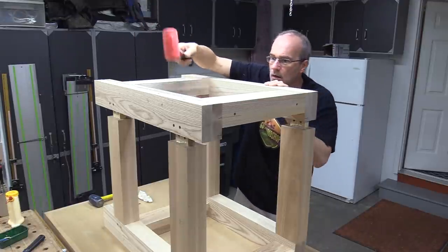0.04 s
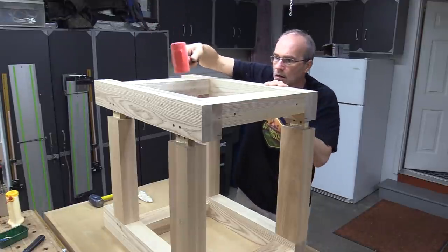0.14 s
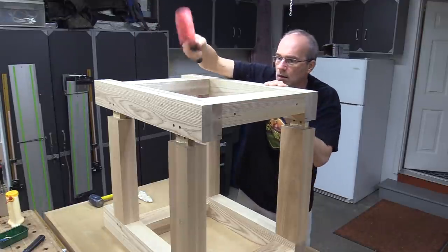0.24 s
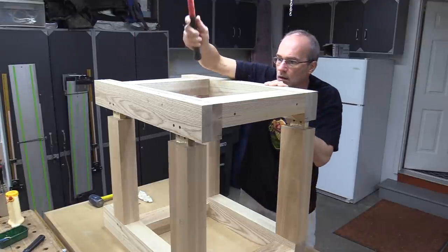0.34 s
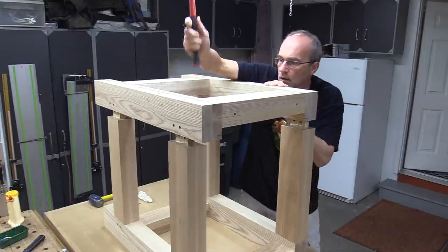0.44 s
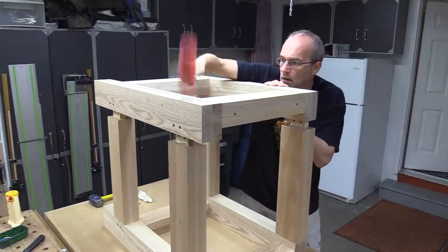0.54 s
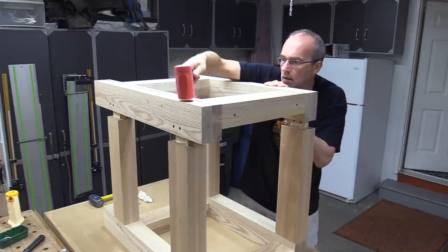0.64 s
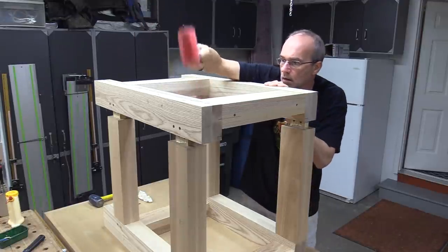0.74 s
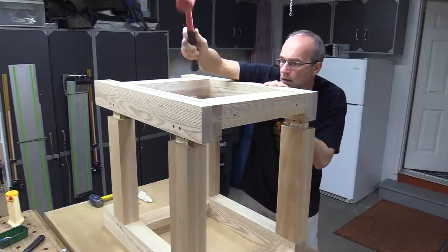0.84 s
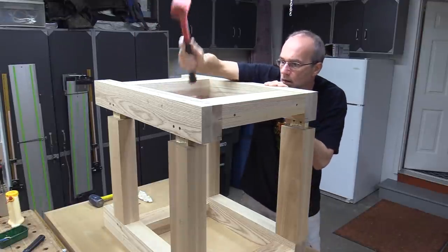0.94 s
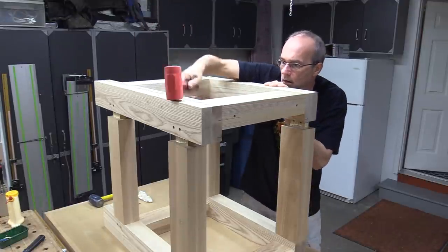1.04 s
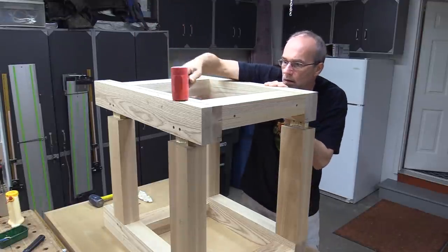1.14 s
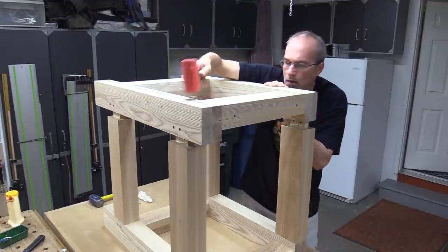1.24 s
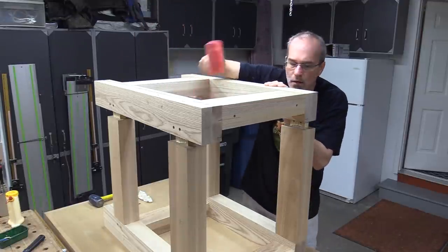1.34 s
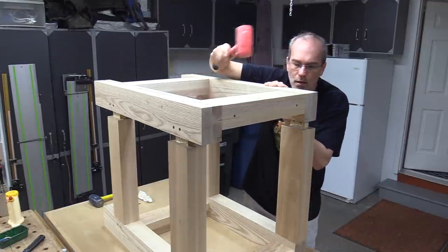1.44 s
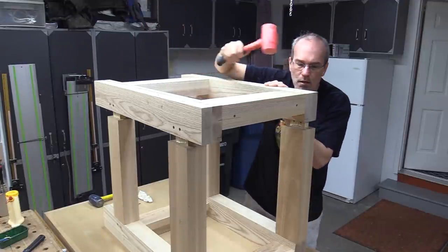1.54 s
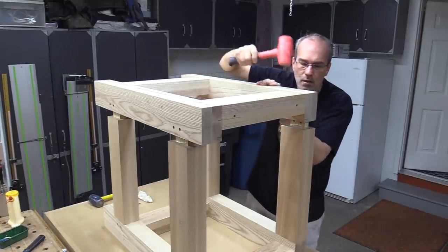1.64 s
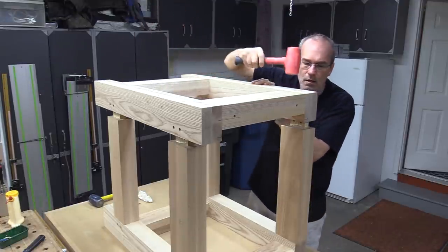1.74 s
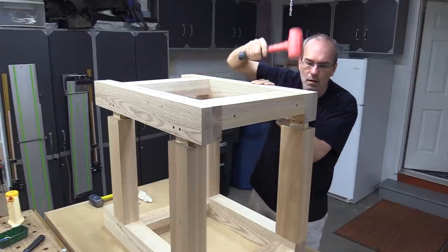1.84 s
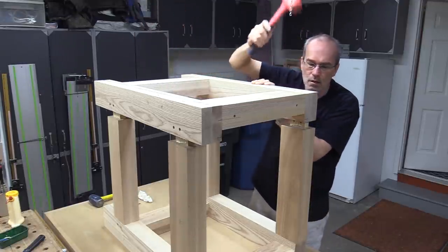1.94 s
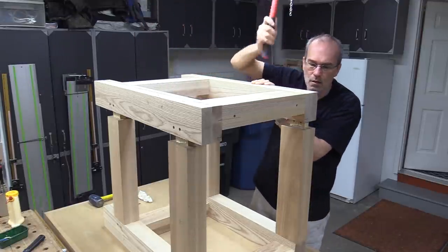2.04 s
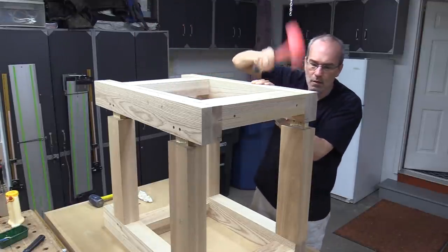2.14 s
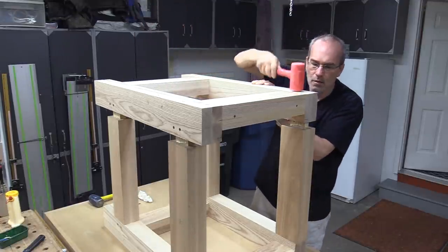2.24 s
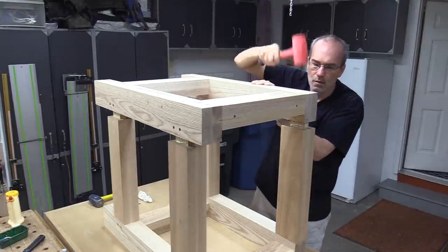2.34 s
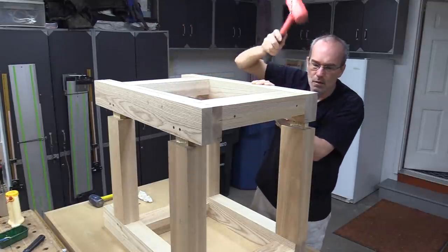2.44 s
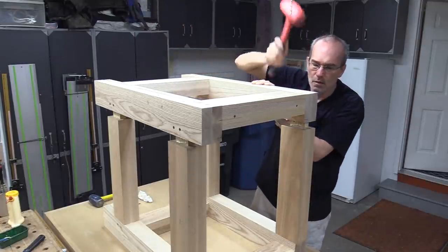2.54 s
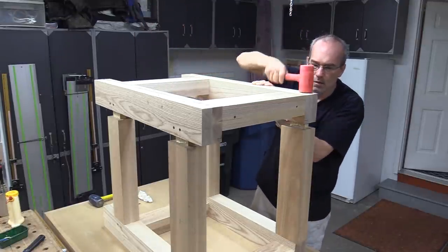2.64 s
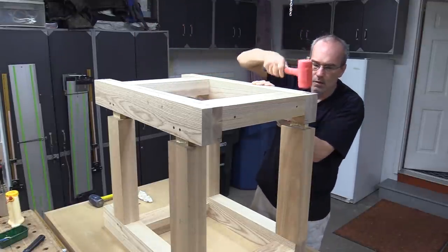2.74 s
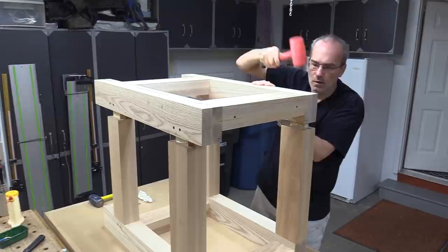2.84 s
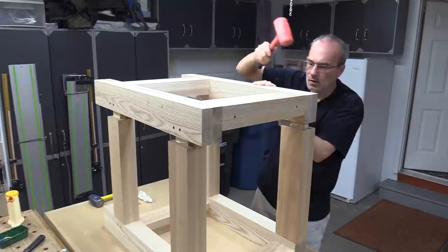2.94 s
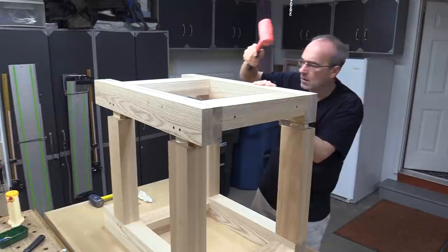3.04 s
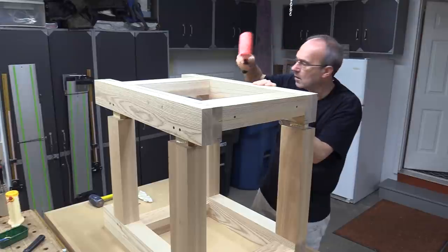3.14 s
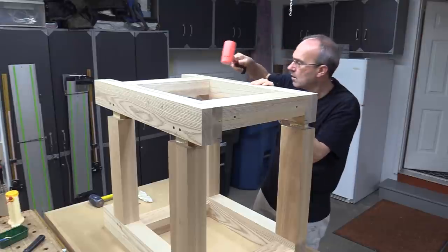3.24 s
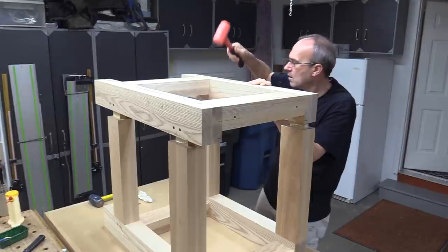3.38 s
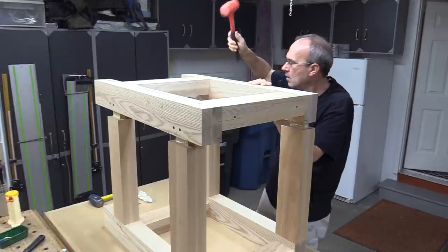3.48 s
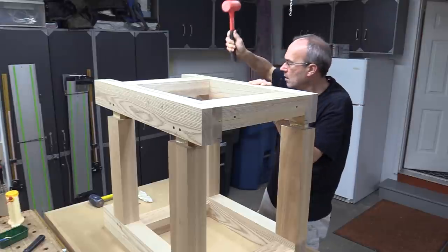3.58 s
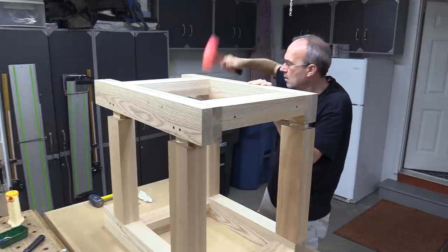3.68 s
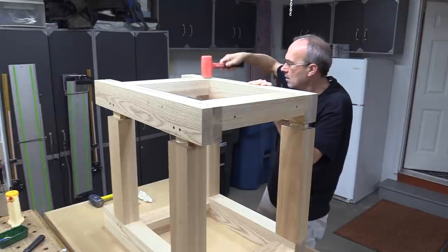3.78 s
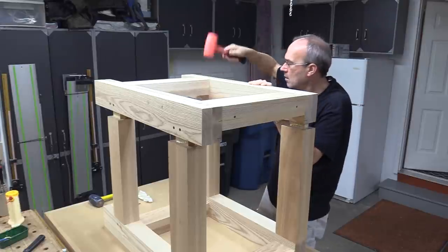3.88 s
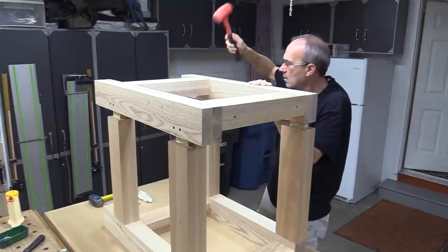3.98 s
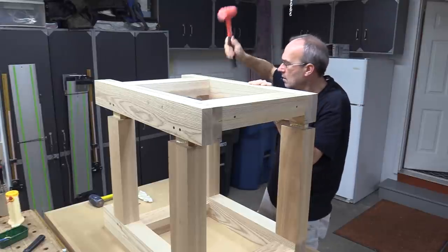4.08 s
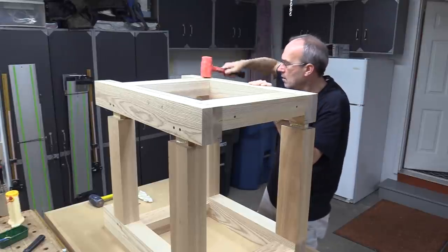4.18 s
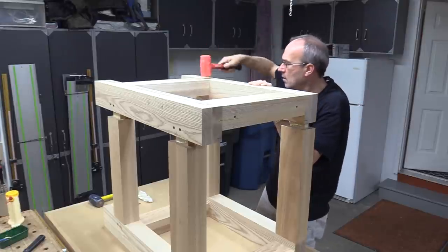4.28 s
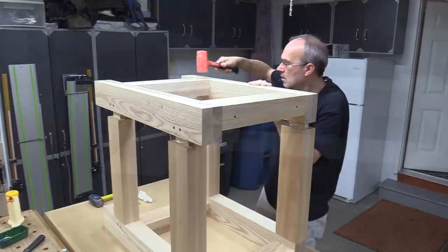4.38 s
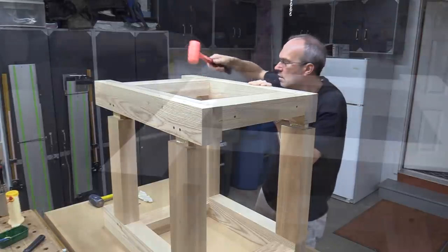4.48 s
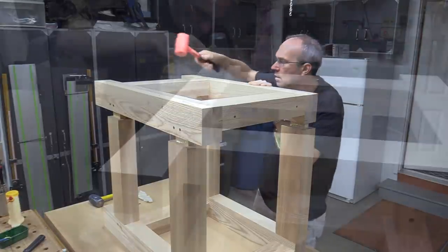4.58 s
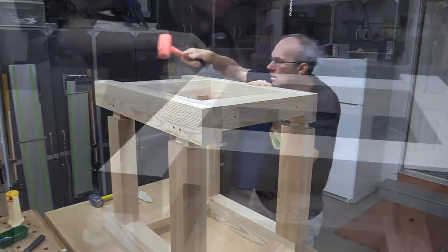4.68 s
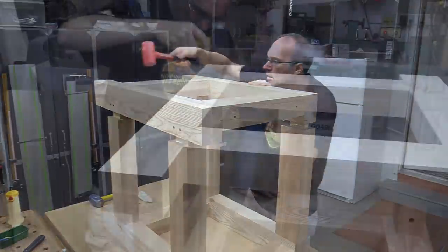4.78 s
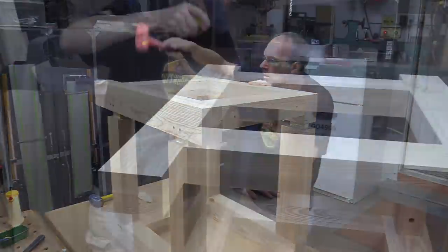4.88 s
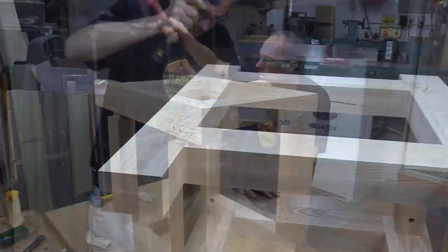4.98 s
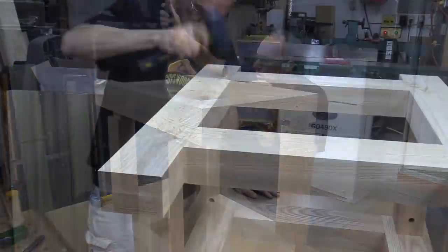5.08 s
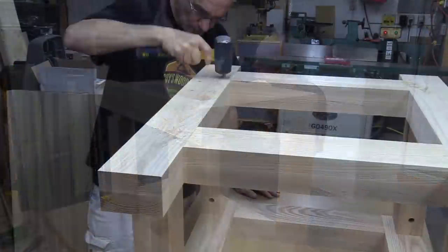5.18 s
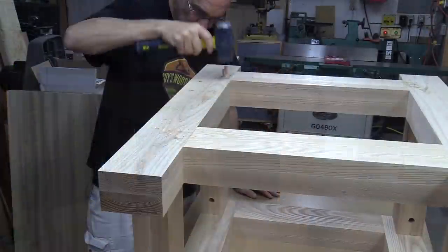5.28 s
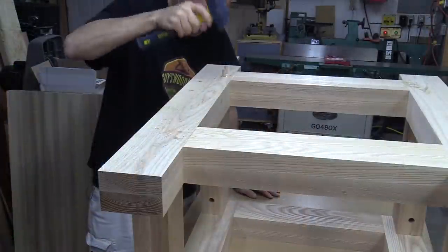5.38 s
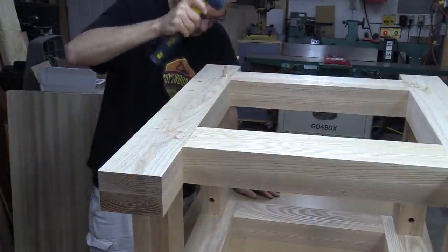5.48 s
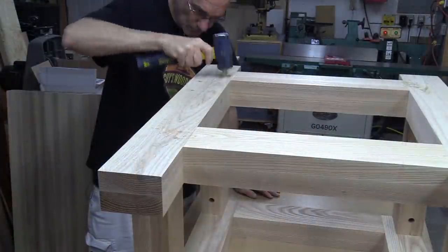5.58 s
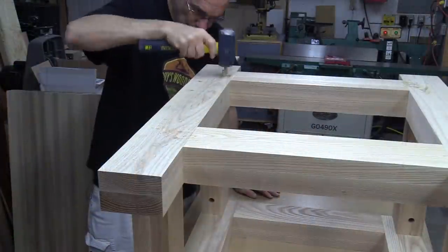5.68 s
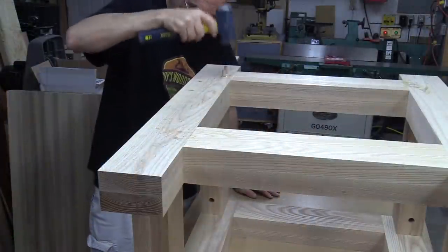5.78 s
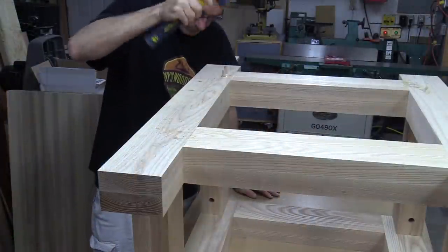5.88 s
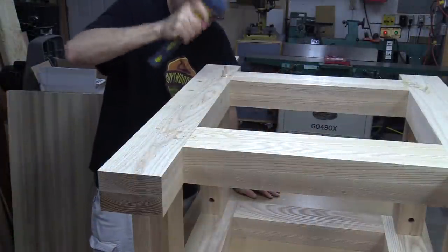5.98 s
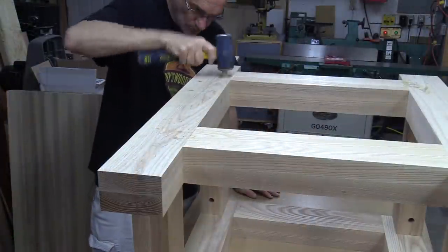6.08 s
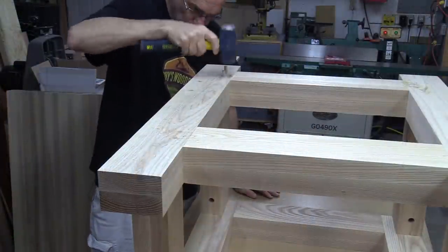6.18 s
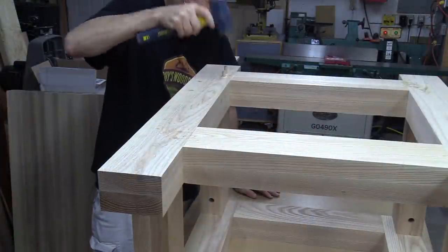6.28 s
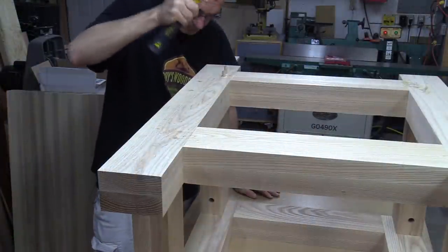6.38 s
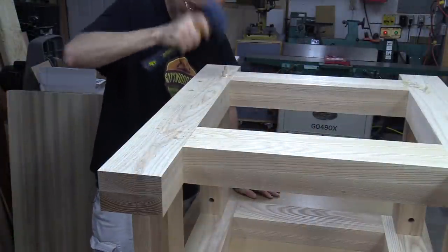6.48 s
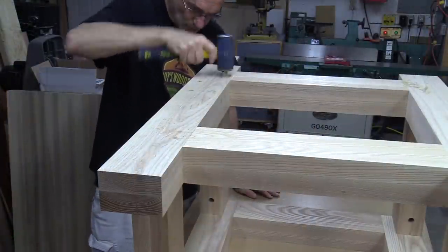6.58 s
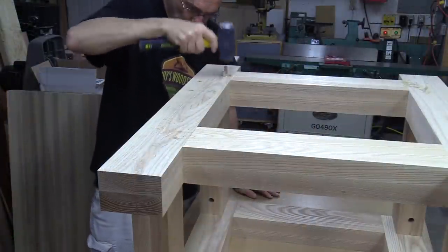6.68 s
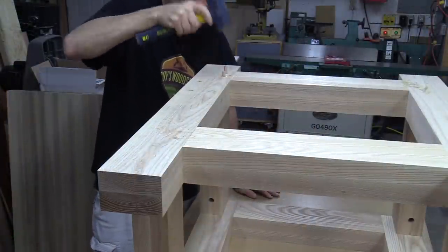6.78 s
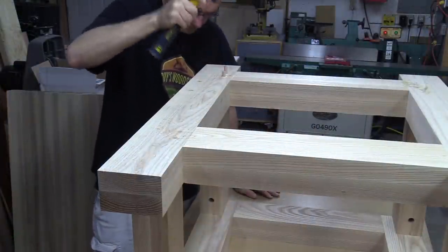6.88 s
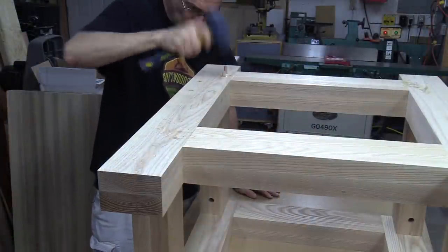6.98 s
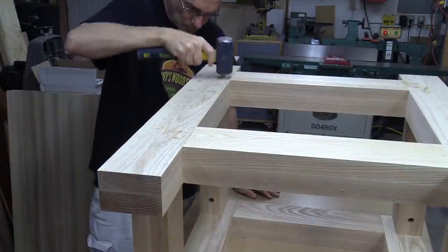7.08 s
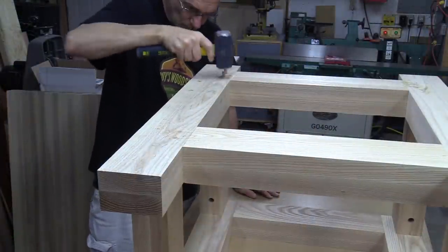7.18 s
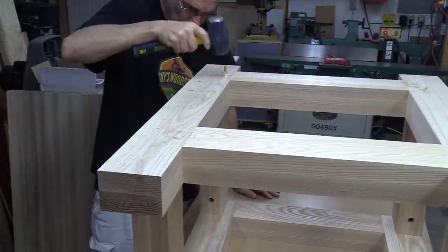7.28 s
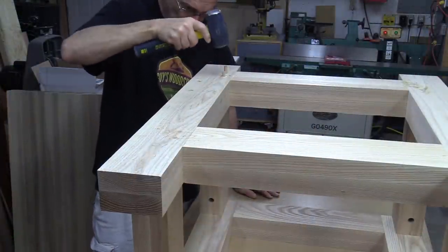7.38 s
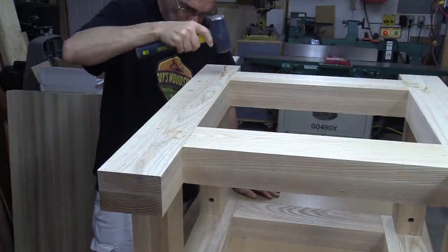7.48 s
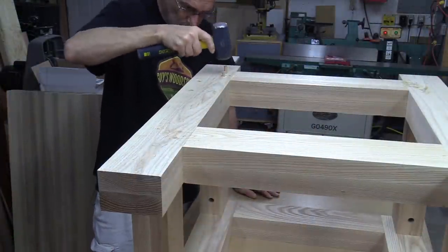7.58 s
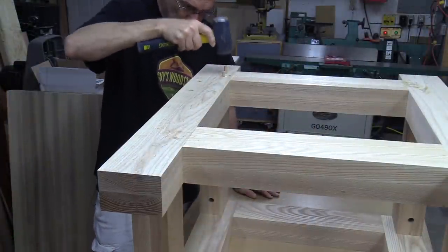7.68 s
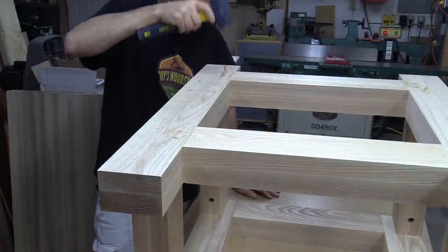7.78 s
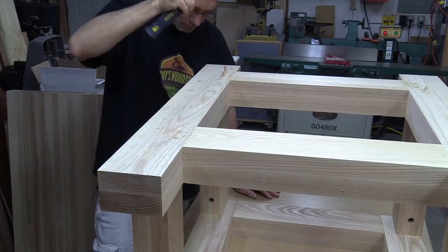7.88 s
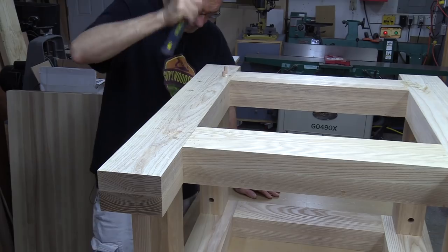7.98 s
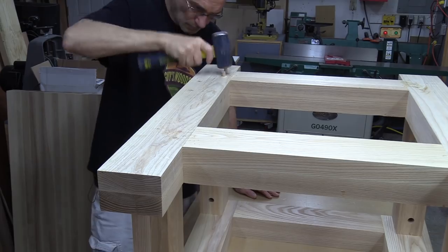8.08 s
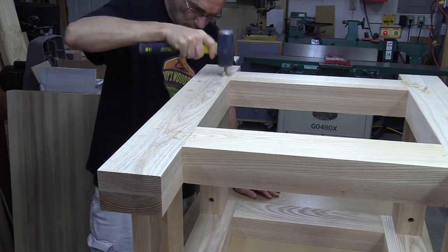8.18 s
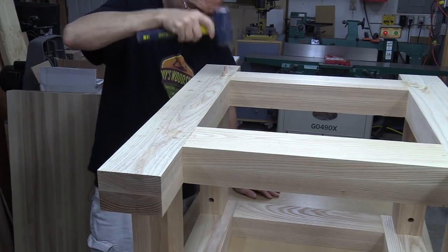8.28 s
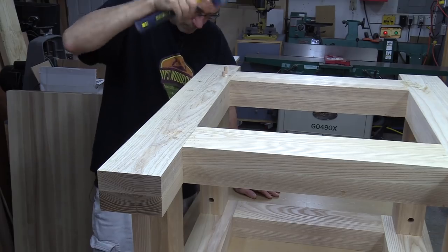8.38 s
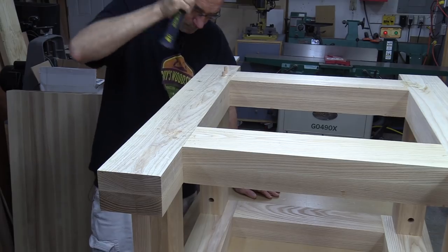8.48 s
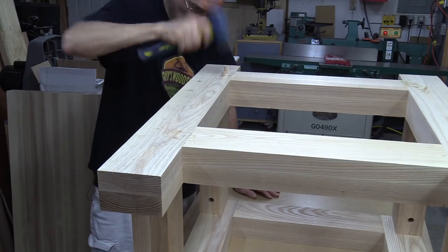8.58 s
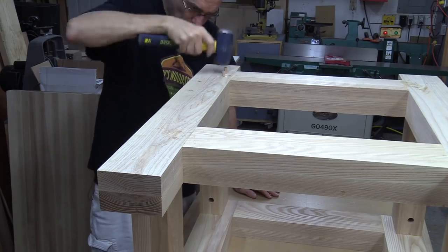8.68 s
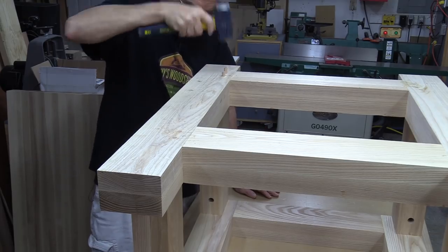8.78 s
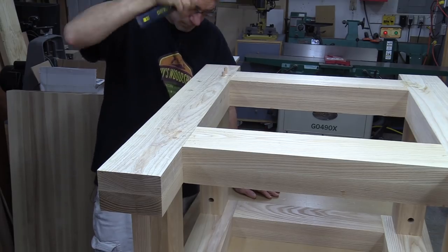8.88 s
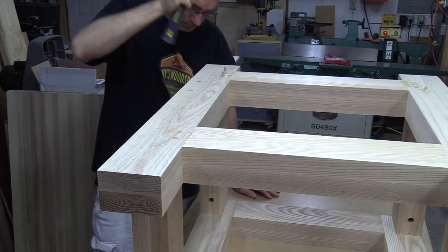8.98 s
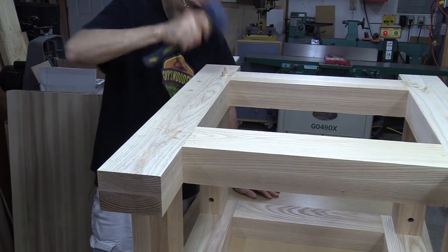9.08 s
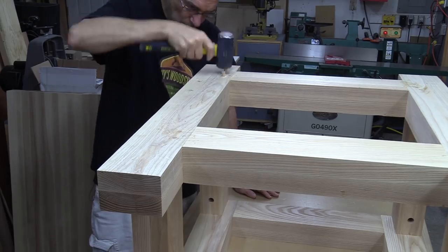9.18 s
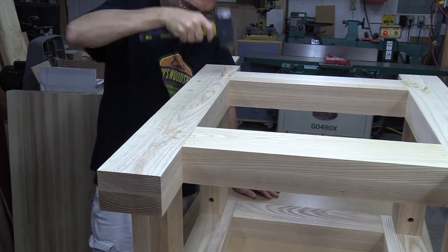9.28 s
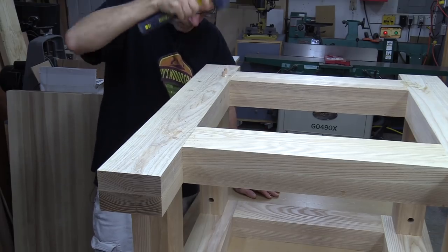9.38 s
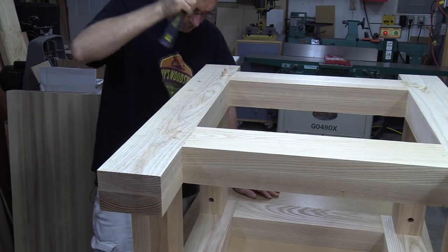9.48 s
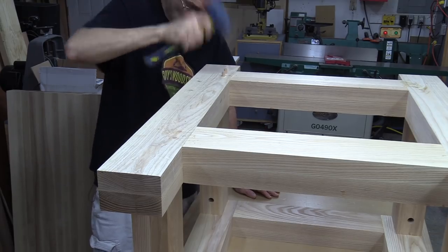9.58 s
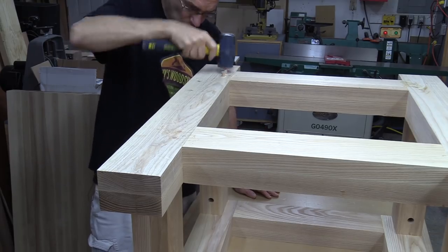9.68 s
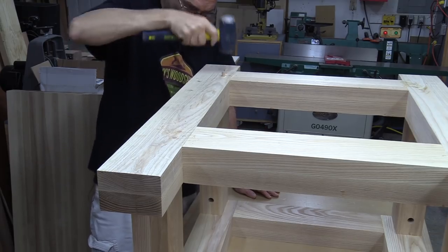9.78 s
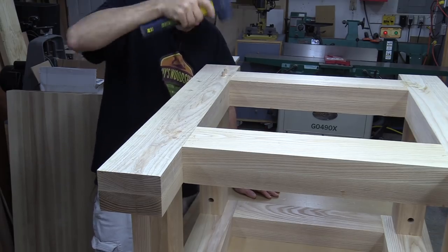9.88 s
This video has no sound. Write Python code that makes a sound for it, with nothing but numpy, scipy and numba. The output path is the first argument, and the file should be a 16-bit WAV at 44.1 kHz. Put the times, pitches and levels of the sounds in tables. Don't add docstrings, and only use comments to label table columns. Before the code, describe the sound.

In a hard-walled workshop, close to the microphone, a shot-filled mallet strikes a heavy wooden frame in three pairs of loud, clipped knocks, with a faint shot rattle before the swings. Then a steel hammer drives one peg with five evenly spaced blows and, after a short gap, a second with four. Each blow leaves a half-second echo over a faint hum.

```python
import sys
import numpy as np
from scipy import signal
from scipy.fft import rfft, irfft, next_fast_len
from scipy.io import wavfile
from scipy.ndimage import uniform_filter1d
from numba import njit

SR = 44100
rng = np.random.default_rng(int(sys.argv[2]) if len(sys.argv) > 2 else 0)


def makeup_ratio(level_db):
    decades = np.asarray(level_db, float) / 20
    return 10 ** decades


def unload_audio(sound):
    columns = np.transpose(np.atleast_2d(sound))
    steps = np.round(np.clip(columns, -1, 1) * 32767)
    wavfile.write(sys.argv[1], SR, steps.astype(np.int16))


N = 437913
SPAN = 40960

# frequency in Hz, level in dB per Hz.
FIRST_AIR = [(12, -45.5), (20, -20.5), (63, -4.5), (87, -16.5), (400, -18.5), (2140, -37.5), (11800, -47.5),
             (22000, -120)]
SECOND_AIR = [(12, -39.5), (20, -4.5), (230, -10), (798, -25), (1100, -23.5), (1930, -36), (11800, -43),
              (22000, -120)]
# start in seconds, end in seconds.
CUT = (4.5, 5.2)
# frequency in Hz, level in dB, t60 in seconds.
FADING = [(1330, -34.5, 0.55), (1200, -44, 0.49), (1040, -40.5, .4), (1550, -57, .4), (695, -42, 0.31)]
# time in seconds, peak in dB.
TAP = [
    (3.399, -36.5),
]
# frequency in Hz, width in Hz, level in dB.
RAIL = [(635, 120, 8.5), (880, 150, 0), (1120, 150, 12.5), (1550, 300, -10.5)]
# centre in seconds, half length in seconds, dull end in dB,
# bright end in dB.
SLIDES = [
    (0.026, .1, -52.5, -46.5),
    (1.748, .064, -52, -49),
    (1.93, .066, -70, -77),
    (3.373, .05, -61.5, -56.5),
    (8.08, .08, -67, -76),
]
# frequency in Hz, width in Hz, level in dB.
DULL_END = [(2870, 550, 11), (4900, 2500, 10.5), (7200, 2500, -1), (10500, 2500, -5)]
BRIGHT_END = [(3700, 900, 1), (5800, 890, -1), (8500, 2000, 0.5), (11300, 3500, 3)]
# lead in seconds, half length in seconds,
# dull end in dB, bright end in dB.
SWINGS = [(.137, .031, -49, -60), (.1, .028, -47, -60)]
# height as a share of the lead, effort in dB.
EFFORT = [(.87, -4), (1.019, 1), (1.02, 0.5)]
# time in seconds, peak in dB.
TICKS = [
    (4.904, -52.5),
]
# start in seconds, peak in dB, treble tilt in dB per octave, crack in dB,
# upper modes in dB.
MALLET = [
    (.657, 3, -1.5, -1, 2),
    (1.11, 0, -7.5, -12.5, -10),
    (2.273, -1.5, -5, -1, -6),
    (2.713, 2.5, -5, 5, 5.5),
    (3.797, -2.5, -5.5, -5, 1.5),
    (4.259, 0.5, -5.5, -3, -2),
]
# frequency in Hz, level in dB per Hz.
PLASTIC = [(18, -36.5), (45, -18), (250, -9.5), (1380, -5), (2450, -23), (10400, -28), (12500, -43),
           (22000, -120)]
# frequency in Hz, width in Hz, level in dB.
PLASTIC_FACE = [(1740, 190, 6.5), (3900, 1500, -12), (6100, 4400, -18.5)]
# frequency in Hz, width in Hz, level in dB at the first, second, third corner.
FRAME = [(167, 68, -17.5, -23, -18.5), (300, 17, -32.5, -21.5, -10), (453.5, 15, -1.5, -24.5, -13),
         (490, 47, -4.5, -23.5, -14.5), (600, 32, -12.5, -30, 5), (644, 12, 8, 10, -12),
         (799, 78, -3.5, -1.5, -16), (976, 55, 3, 0.5, -7), (1320, 110, -11.5, -8.5, -1),
         (1610, 120, -19, -6.5, -11.5), (1760, 210, -12, -10.5, -16.5), (2190, 270, -13.5, -19, -20),
         (2790, 250, -16.5, -23.5, -24), (3140, 45, -36.5, -19, -28)]
# frequency in Hz, change in dB.
CLOSED = [(300, 2.5), (470, 10), (660, -3), (740, 4.5), (1400, -5), (2800, -0.4)]
# start in seconds, peak in dB, peg driven home from 0 to 1, head ring in dB.
HAMMER = [
    (5.21, -4, .1, -32),
    (5.674, -1, 0.6, -41.5),
    (6.139, -1, 0.8, -29.5),
    (6.621, -1, .9, -28),
    (7.111, 0, .95, -29.5),
    (8.178, -3, .05, -23.5),
    (8.71, -3.5, 0.4, -25),
    (9.22, -3.5, 0.3, -27),
    (9.72, 0, 0.8, -34),
]
# frequency in Hz, level in dB per Hz.
STEEL = [(18, -34), (50, -12), (120, -11), (260, -1.5), (2000, -22.5), (5500, -34.5), (11500, -42.5),
         (22000, -120)]
# frequency in Hz, width in Hz, level in dB.
STEEL_FACE = [(1500, 680, 3), (3870, 550, 8), (6050, 2500, -11), (10700, 830, -12)]
# frequency in Hz, width in Hz, level in dB for a loose peg, for one driven home.
PEGGED = [(158.6, 9.7, 7, -5), (229.3, 23, 2.5, -2), (345.8, 9.9, -5.5, 9.5), (461.4, 7.7, -3, 9.5),
          (726.5, 37, -0.5, -1), (989, 22, 1.5, -7), (1346, 72, -4.5, -15.5), (1623, 69, -2, -16),
          (2540, 58, -20.5, -22.5)]
# frequency in Hz, width in Hz, level in dB.
HEADS = [
    [(3740, 600, 6), (5750, 560, 2)],
    [(3710, 550, 0.5), (4350, 380, 2.5)],
]
# frequency in Hz, t60 in seconds.
SHOP = [(60, 0.43), (250, 0.46), (1000, 0.56), (4000, 0.55), (10000, 0.42)]
# frequency in Hz, build-up in seconds.
BUILDS = [(1000, 0.0013), (5000, 0.018)]


def unit(x):
    return x / np.sqrt(np.mean(x ** 2) + 1e-20)


def along(points, hz):
    f, v = np.transpose(points)
    return np.interp(np.log(hz + 1), np.log(f + 1), v)


def resonances(peaks, f):
    total = 0
    for k, (centre, width, db) in enumerate(peaks):
        damping = 1j * f * width
        total = total + (-1) ** k * makeup_ratio(db) * damping / (centre * centre - f * f + damping)
    return total


def causal(gain):
    cepstrum = irfft(np.log(gain + 1e-6))
    cepstrum[1:len(cepstrum) // 2] *= 2
    cepstrum[len(cepstrum) // 2 + 1:] = 0
    return np.exp(rfft(cepstrum))


def noise(response, size):
    m = next_fast_len(size)
    spectrum = rfft(rng.standard_normal(m)) * response(np.fft.rfftfreq(m, 1 / SR))
    return unit(irfft(spectrum, m)[:size])


def add(track, s, sound):
    part = track[round(s * SR):][:len(sound)]
    part += sound[:len(part)]


def air():
    def room(points, db):
        return makeup_ratio(db) * noise(lambda f: makeup_ratio(along(points, f)), N)

    def hum(hz, width, db):
        return makeup_ratio(db) * noise(lambda f: resonances([(hz, width, 0)], f) ** 2, N)

    later = np.interp(np.arange(N) / SR, CUT, (0, 1))
    first = room(FIRST_AIR, db=-48.5) + hum(59, width=10, db=-62)
    second = room(SECOND_AIR, db=-47.9) + hum(908, width=9, db=-63)
    return (1 - later) * first + later * second


def shop_tail():
    hz, t, z = signal.stft(rng.standard_normal(SPAN), SR, nperseg=256)
    decay = makeup_ratio(-60 * t / along(SHOP, hz)[:, None])
    build = 1 - np.exp(-(t / along(BUILDS, hz)[:, None]) ** 2)
    tail = signal.istft(z * decay * build, SR, nperseg=256)[1][:SPAN]
    tail = tail * (1 - np.exp(-np.arange(SPAN) / SR / 0.0053))
    return tail / np.linalg.norm(tail)


def blow(colour, peaks, face, tail, row, broad_db, wet_db, snap_db, ring_db, ring_s, thump_hz, bite_s,
         crack_s, spike_db):
    tilt_db, crack_db, thump_db = row
    f, t = np.fft.rfftfreq(SPAN, 1 / SR), np.arange(SPAN) / SR

    def slope(hz):
        tilt = np.log2((hz / 1000 + 1) / (hz / 6000 + 1))
        return tilt_db * tilt + thump_db / (1 + (hz / thump_hz) ** 2)

    body = causal(makeup_ratio(slope(f)) * (makeup_ratio(along(colour, f) + broad_db) + abs(resonances(peaks, f))))
    ring = rng.standard_normal(SPAN) * makeup_ratio(-60 * t / ring_s)
    ring = rfft(ring / np.linalg.norm(ring)) / (1 + 1j * f / 900)
    sound = irfft(body * (1 + makeup_ratio(ring_db) * ring + makeup_ratio(wet_db) * rfft(tail)))
    sound = sound * (1 - np.exp(-t / bite_s))
    sound = sound / np.sqrt(np.mean(sound[:SR // 5] ** 2))

    crack = noise(lambda hz: makeup_ratio(slope(hz)) * resonances(face, hz), SPAN)
    spike = makeup_ratio(spike_db - 60 * t / .007)
    crack = crack * (makeup_ratio(-60 * t / crack_s) + spike) * np.minimum(t / 0.0013, 1)
    return sound + makeup_ratio(crack_db + snap_db) * crack


def small_knocks():
    out, t = np.zeros(N), np.arange(SPAN) / SR
    for hz, db, t60 in FADING:
        add(out, 0, makeup_ratio(db - 60 * t / t60) * noise(lambda f: resonances([(hz, 60, 0)], f), SPAN))
    for s, db in TAP:
        touch = blow(PLASTIC, RAIL, PLASTIC_FACE, shop_tail(), (0, 0, 0), broad_db=-16, wet_db=-1, snap_db=-20,
                     ring_db=28, ring_s=0.096, thump_hz=130, bite_s=0.00088, crack_s=.02, spike_db=-4)
        add(out, s, makeup_ratio(db - 15.5) * touch)
    return out


def shot():
    def hollow(end):
        return noise(lambda f: sum(abs(resonances([mode], f)) ** 2 for mode in end), N)

    t = np.arange(N) / SR
    grit = makeup_ratio(0.95 * unit(uniform_filter1d(rng.standard_normal(N), size=90)))
    dull, bright = hollow(DULL_END) * grit, hollow(BRIGHT_END) * grit

    slides = list(SLIDES)
    for corner, (height, effort_db) in enumerate(EFFORT):
        pair = MALLET[2 * corner:2 * corner + 2]
        for row, (lead, half, dull_db, bright_db) in zip(pair, SWINGS):
            slides.append((row[0] - height * lead, half, dull_db + effort_db, bright_db + effort_db))

    out = np.zeros(N)
    for s, half, dull_db, bright_db in slides:
        u = (t - s) / half
        swell = np.exp(-np.where(u < 0, .6, 1.2) * u ** 2)
        out += swell * (makeup_ratio(dull_db) * dull + makeup_ratio(bright_db) * bright)

    landings = [(row[0] + .027, -20) for row in MALLET[::2]]
    for s, db in list(TICKS) + landings:
        out += makeup_ratio(db) * np.exp(-((t - s) / .0012) ** 2) * dull
    return out


def mallet():
    out, t = np.zeros(N), np.arange(SR // 4) / SR
    for k, (s, db, tilt_db, crack_db, upper_db) in enumerate(MALLET):
        corner, closed = divmod(k, 2)
        joint = []
        for hz, width, *corner_db in FRAME:
            mode_db = corner_db[corner] + closed * along(CLOSED, hz)
            mode_db += upper_db * (hz > 1550)
            joint.append((hz, width, mode_db))
        add(out, s + 0.0025, makeup_ratio(db - 8 - 60 * t / .09) * np.sin(2 * np.pi * 105 * t))
        row = tilt_db, crack_db, 2 if closed else 0
        knock = blow(PLASTIC, joint, PLASTIC_FACE, shop_tail(), row, broad_db=0, wet_db=7, snap_db=7.5,
                     ring_db=12.5, ring_s=0.11, thump_hz=130, bite_s=0.001, crack_s=0.05, spike_db=-15)
        add(out, s + .0018, makeup_ratio(db + 2.5) * knock)
    return out


def hammer():
    loose_tilt_db, home_tilt_db = 4.88, -0.13
    out = np.zeros(N)
    for blows, head in zip((HAMMER[:5], HAMMER[5:]), HEADS):
        same = shop_tail()
        for s, db, home, head_db in blows:
            tail = 0.47 * same + .35 * shop_tail()
            peg = [(hz, w, loose + home * (driven - loose)) for hz, w, loose, driven in PEGGED]
            peg += [(hz, w, ring + head_db) for hz, w, ring in head]
            tilt_db = loose_tilt_db + home * (home_tilt_db - loose_tilt_db)
            crack_db = 0.22 * (head_db + 30)
            knock = blow(STEEL, peg, STEEL_FACE, tail, (tilt_db, crack_db, 0), broad_db=5.5, wet_db=6,
                         snap_db=-9.5, ring_db=7.5, ring_s=0.12, thump_hz=480, bite_s=0.0042,
                         crack_s=0.09, spike_db=15.5)
            add(out, s, makeup_ratio(db + 4.5) * knock)
    return out


def scene():
    return (air() + small_knocks() + shot() + mallet() + hammer())[None]


@njit
def follow(level, rise, fall):
    out = np.empty_like(level)
    held = 0.0
    for i in range(len(level)):
        held += (level[i] - held) * (rise if level[i] > held else fall)
        out[i] = held
    return out


def thin_treble(x, from_hz, under_db, share):
    hz, _, z = signal.stft(x, SR, nperseg=2048)
    power = abs(z) ** 2
    patch = uniform_filter1d(power, size=6, axis=1)
    around = uniform_filter1d(power, size=40, axis=1)
    masked = around < power.sum(axis=1, keepdims=True) * makeup_ratio(2 * under_db)
    higher = np.clip(np.log2(hz / from_hz + 1e-9), 0, 1)[:, None]
    dropped = masked & (patch < share * higher * around)
    return signal.istft(z * ~dropped, SR, nperseg=2048)[1][:, :N] if x.ndim > 1 else \
        signal.istft(z * ~dropped, SR, nperseg=2048)[1][:N]


def band_limit(x):
    return signal.sosfilt(signal.butter(12, 11990, fs=SR, output="sos"), x)


def record(dry):
    attack_s, release_s, ceiling_db = .0027, .03, -5.5
    held = follow(abs(dry[0]), 1 / (SR * attack_s), 1 / (SR * release_s))
    x = dry / np.maximum(1, held / makeup_ratio(ceiling_db))
    x = x / (1 + abs(x / .99) ** 5) ** (1 / 5)
    x = signal.lfilter(*signal.butter(3, 11500, fs=SR), x)
    x = thin_treble(x[0], from_hz=4600, under_db=-51, share=.88)[None]
    return band_limit(x)


dry = scene()
out = record(dry)
unload_audio(out)
```